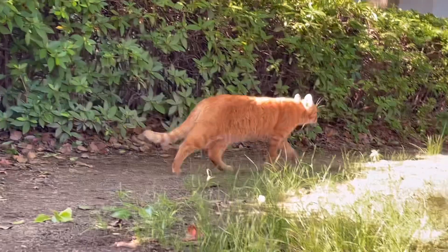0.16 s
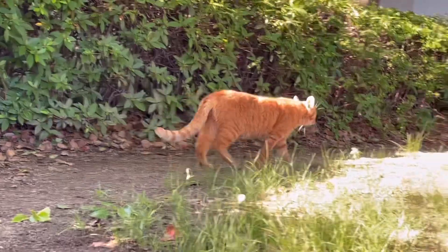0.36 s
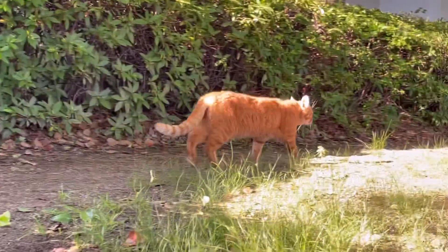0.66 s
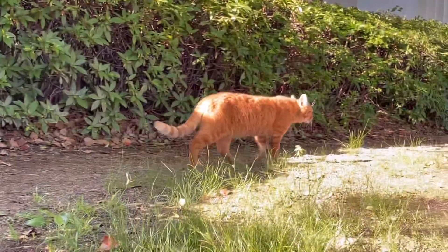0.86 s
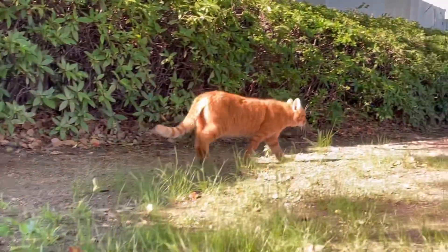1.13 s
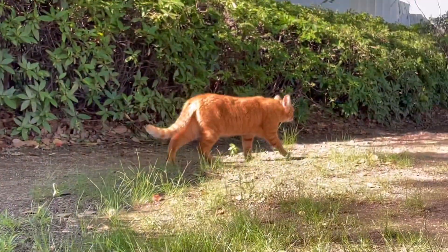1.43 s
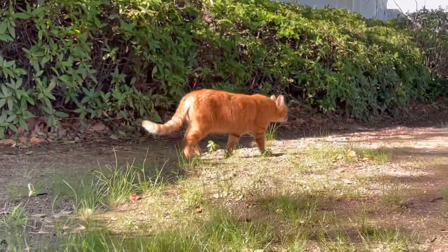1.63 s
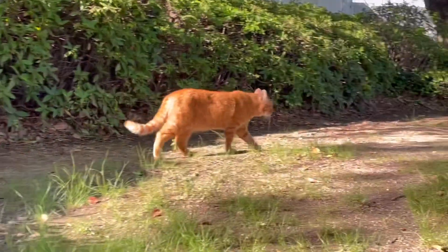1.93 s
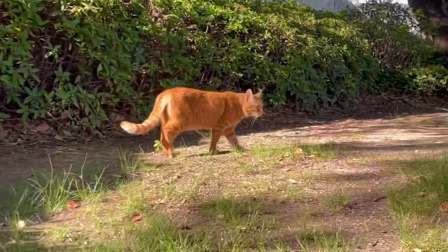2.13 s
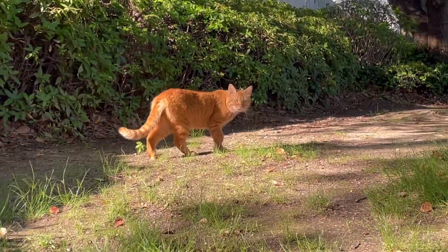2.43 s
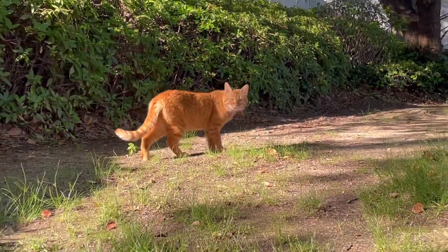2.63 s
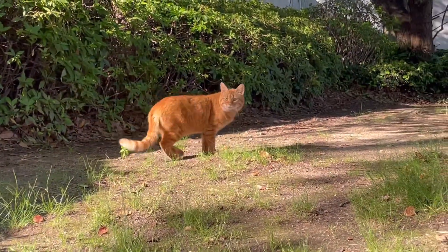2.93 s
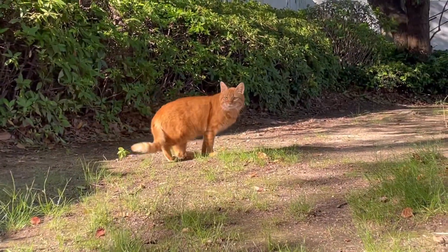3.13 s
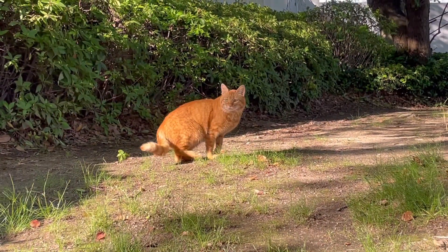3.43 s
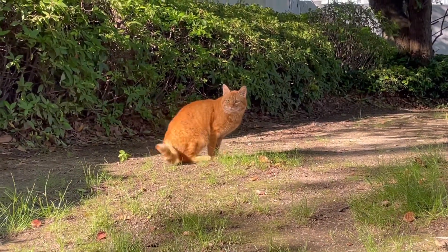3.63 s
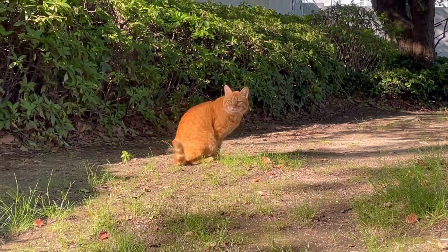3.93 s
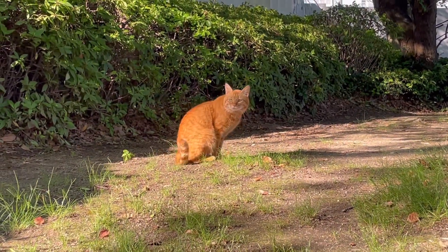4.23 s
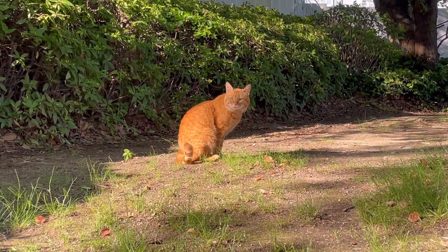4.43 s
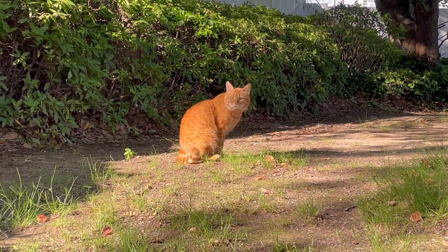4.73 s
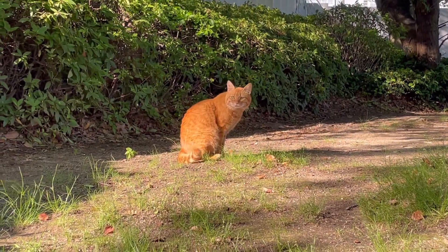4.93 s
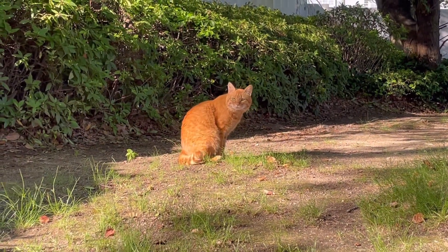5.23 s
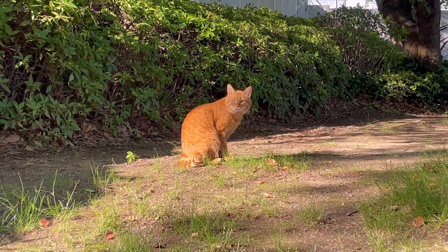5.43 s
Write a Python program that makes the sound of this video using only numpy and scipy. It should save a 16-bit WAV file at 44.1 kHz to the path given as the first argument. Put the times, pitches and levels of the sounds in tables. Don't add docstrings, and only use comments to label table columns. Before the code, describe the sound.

The sound starts in the middle of a crow's caw, close and much louder than everything else: harsh, buzzy and nasal, steady at first, then sagging in pitch and turning breathy before stopping at about 0.4 s. Trees smear it, and building echoes return around 0.6 to 1.2 s, leaning right. From 0.4 to 1.5 s dull scrapes, a short fine crackle and small ticks come from cloth or leaves near the phone; another rub begins just before the end. Faint, broken sparrow chatter is scattered from 0.8 s on, with clearer cheeps near 1.9, 3.0 and 3.95 s and a few quick notes after 5.1 s. Beneath lie deep town rumble, soft airy hiss and a wavering low hum. A heavy engine rises after 1 s, is strongest near 2.9 s, revs slightly higher, then recedes. The cat is not heard.

```python
import sys
import numpy as np
from scipy import signal
from scipy.fft import rfft, irfft
from scipy.io import wavfile
from scipy.ndimage import uniform_filter1d

SR = 44100
rng = np.random.default_rng(int(sys.argv[2]) if len(sys.argv) > 2 else 0)


def amplitude_ratio(level_db):
    exponent = np.asarray(level_db, float) / 20
    return 10 ** exponent


def unload_wav(signal):
    wavfile.write(
        sys.argv[1],
        SR,
        np.round(np.clip(np.atleast_2d(signal).T, -1, 1) * 32767).astype(np.int16),
    )


N = 245195
T = np.arange(N) / SR
LEAD = 2 * SR // 5

# (frequency [Hz], level [dB per Hz])
RUMBLE_MID = [(20, -22), (33, -7.5), (55, 8), (90, 4), (130, -1.5), (200, -11), (280, -16), (400, -25),
              (520, -49.5)]
RUMBLE_SIDE = [(20, -18), (55, -32.5), (90, -20), (200, -9), (300, -25), (400, -16), (520, -50.5)]
# (frequency [Hz], level [dB per Hz])
AIR_MID = [(250, 5), (450, 4), (1300, 1), (2000, -6), (3000, -8), (6500, -12.5), (8000, -16.5),
           (10500, -13), (12000, -13.5), (14000, -36)]
AIR_SIDE = [(250, -28), (450, 4), (1200, 2), (1700, -24), (3000, -28), (5500, -15.5), (7500, -10),
            (9000, -7), (11000, -11), (13000, -35)]
# (frequency [Hz], left minus right [dB])
TOWN_LEAN = [(60, -0.5), (170, 1.5), (320, 4), (900, 2), (1700, 3), (2600, 0)]
# (time [s], level [dB])
HUM = [
    (0, -46),
    (1.1, -50.5),
    (1.6, -44),
    (3.3, -41),
    (5.56, -50.5),
]
# (time [s], firing rate [Hz], level [dB])
ENGINE = [
    (0, 41.25, -70),
    (.95, 42.74, -53.5),
    (1.3, 44.14, -43),
    (2.4, 42.87, -46),
    (2.9, 42.97, -41.5),
    (3.3, 45.85, -46.5),
    (3.7, 45.93, -48),
    (4.1, 47.1, -53),
    (4.7, 47.36, -50.5),
    (5.56, 47.35, -54),
]
# (multiple of firing rate [1], level [dB])
ENGINE_ORDERS = [(1, -1.5), (2, -9.5), (3, -13.5), (4, -12), (5, -15), (7, -46.5), (8, -30.5), (9, -30)]
# (time [s], left minus right [dB])
MACHINE_PAN = [(0.0, 7.5), (0.73, -12), (1.16, -7), (1.79, -3.5), (3.24, -1.5), (3.95, -10.5), (4.21, -11),
               (5.11, 6.5), (5.56, -3)]
# (start [s], length [s], level [dB])
SCRAPES = [
    (.4, .24, -61),
    (.72, 0.68, -58.5),
    (1.36, 0.214, -59),
    (5.51, .2, -59),
]
# (start [s], length [s], level [dB])
CRACKLES = [
    (.59, 0.062, -62),
    (.68, 0.23, -57.5),
]
# (time [s], dull level [dB], bright level [dB])
TICKS = [
    (.645, -62, -64),
    (.674, -53, -80),
    (.686, -77, -54),
    (.708, -68, -55),
    (.733, -79, -70),
    (.766, -58, -64),
    (.805, -61, -62),
    (.865, -65, -80),
    (1.375, -55.5, -90),
]
# (time [s], level [dB], pitch [Hz], length [s])
CHATTER_NOTES = [(0.787, -61, 848, 0.014), (0.846, -62, 817, 0.033), (0.93, -61, 741, 0.044),
                 (1.018, -59, 752, 0.03), (1.082, -57.5, 793, 0.033), (1.318, -61, 742, 0.037),
                 (1.423, -68, 803, 0.026), (1.478, -57, 770, 0.026), (1.623, -63.5, 772.3, 0.042),
                 (1.789, -62, 760, .032), (2.037, -61, 870, 0.038), (2.196, -63, 900, .039),
                 (2.309, -62, 800, 0.042), (2.448, -66.5, 778, 0.049), (2.552, -62, 912, 0.045),
                 (3.39, -67, 865, .035), (4.092, -62.5, 938, 0.064), (4.177, -68, 875, 0.0295),
                 (4.641, -61.5, 798, 0.06), (4.69, -58, 787, 0.053), (5.157, -60.5, 737, .022),
                 (5.237, -60, 828, 0.016), (5.306, -56.5, 870, .026), (5.381, -56, 893, 0.037)]
# (time [s], level [dB])
CHEEPS = [
    (1.893, -50),
    (3.01, -51),
    (3.95, -50),
]
# (start [s], length [s], from [Hz], to [Hz], level [dB])
CHEEP_PARTS = [
    (-.01, 0.022, 4880, 5600, -14),
    (0, .014, 2885, 4520, -10),
    (.013, 0.019, 4460, 3980, -4),
    (0.025, .011, 3900, 3000, -7),
    (.035, 0.017, 3010, 2630, -3.5),
]
# (time [s], pitch [Hz])
CAW_PITCH = [
    (0, 387),
    (.056, 387),
    (.12, 375.9),
    (.174, 367),
    (.24, 349.6),
    (.29, 326.3),
    (.342, 304.2),
    (.36, 272),
    (.385, 224.1),
]
# (frequency [Hz], level [dB])
THROAT = [(300, -50), (420, -65), (600, -45.5), (780, -45), (930, -31), (1160, -27.5), (1450, -34.5),
          (1750, -27.5), (1950, -41.5), (2200, -37), (2680, -34), (3050, -50.5), (3300, -68.5),
          (4600, -54.5)]
THROAT_TOP = [(4600, -1.5), (5500, 4), (6500, -8), (7500, -30.5), (12000, -24)]
# (centre [Hz], width [Hz], gain [dB])
NOTCHES = [(1238, 25, 5), (1080, 4.6, -5), (1299, 4.7, -9), (1366, 12, -12.5), (1477, 4.9, -26),
           (1471, 12, -24), (2368, 150, -17), (2770, 12, -22.5), (4190, 100, -9), (5155, 160, -17),
           (5820, 290, -14.5)]
# (frequency [Hz], level [dB per Hz])
RASP = [(1500, -58), (3300, -6), (4800, -6.5), (6300, -12), (7500, -5.5), (10000, -15.5), (14000, -19.5)]
# (frequency [Hz], level [dB])
CAW_SIDE = [(300, -28), (1000, -5.5), (1500, -12), (2700, -7), (5000, -3.5), (7500, 7.5), (9000, 11.5),
            (11000, -2)]
# (delay [s], level [dB])
FACADES = [
    (.58, -46),
    (.8, -35),
]
# (frequency [Hz], gain [dB])
PORTS = [(7800, -1), (8300, -12.5), (9500, -13), (10000, -5), (12500, -3.5), (14500, -15), (15500, -25)]


def curve(table, t=T):
    s, *columns = np.transpose(table)
    return [np.interp(t, s, c) for c in columns]


def shape(table, hz):
    f, db = np.transpose(table)
    return np.interp(np.log(np.maximum(hz, 1)), np.log(f), db)


def colour(x, table):
    hz = np.fft.rfftfreq(x.shape[-1], 1 / SR)
    return irfft(rfft(x) * amplitude_ratio(shape(table, hz)), x.shape[-1])


def unit(x):
    return x / np.sqrt(np.mean(x ** 2))


def stereo(mid, side):
    return np.array([mid + side, mid - side])


def walk(rate, size=N):
    k = int(SR / rate)
    steps = np.repeat(rng.standard_normal(size // k + 1), k)
    return 1.458 * uniform_filter1d(uniform_filter1d(steps, k), k)[:size]


def add(out, x, s):
    i = int(s * SR)
    x = x[..., :N - i]
    out[..., i:i + x.shape[-1]] += x


def town():
    hum_db = curve(HUM)[0]
    rumble_db = -50 + 0.41 * (hum_db - hum_db.max())
    air_db = -77.5 + 5.5 * np.exp(-T ** 2)
    breeze_db = -5.5 + 2.5 * T
    noise = rng.standard_normal((4, N))
    rumble = stereo(colour(noise[0], RUMBLE_MID), colour(noise[1], RUMBLE_SIDE))
    rumble = rumble * amplitude_ratio(rumble_db + 25.5 + 1.18 * walk(3.01))
    air = stereo(colour(noise[2], AIR_MID), colour(noise[3], AIR_SIDE))
    top = colour(air, [(3000, -29), (6000, -4), (8000, -4.5)])
    air = (air + top * (amplitude_ratio(breeze_db) - 1)) * amplitude_ratio(air_db + 20.5)
    both = rumble + air * amplitude_ratio(0.6 * walk(4))
    left = colour(both[0], [(f, d / 2) for f, d in TOWN_LEAN])
    right = colour(both[1], [(f, -d / 2) for f, d in TOWN_LEAN])
    return np.array([left, right])


def hum():
    hz = 68.2 * (1 + 0.0078 * walk(12))
    level_db = curve(HUM)[0] + 3.5 * walk(9)
    tone = np.sqrt(2) * np.sin(2 * np.pi * np.cumsum(hz) / SR) * amplitude_ratio(level_db)
    return stereo(tone, -0.02 * tone)


def engine():
    hz, db = curve(ENGINE)
    phase = 2 * np.pi * np.cumsum(hz * (1 + 0.0066 * walk(5.64))) / SR
    tone = np.zeros(N)
    for k, order_db in ENGINE_ORDERS:
        level = amplitude_ratio(order_db + 2.53 * walk(8)) * np.sqrt(2)
        tone += level * np.sin(k * phase + rng.uniform(0, 6.7))
    return stereo(tone, -colour(tone, [(40, -43), (200, -4.5)])) * amplitude_ratio(db)


def strokes(table, db_per_s):
    attack_s, release_s = 0.041, 0.023
    gain = np.zeros(N)
    for s, length, db in table:
        attack = np.clip((T - s) / attack_s, 0, 1) ** 2
        release = np.clip(1 - (T - s - length) / release_s, 0, 1) ** 2
        gain += amplitude_ratio(db + db_per_s * np.maximum(T - s, 0)) * attack * release
    return gain


def rustle():
    dull = [(150, -38), (300, -3.5), (900, -5.0), (1500, -12.5), (2500, -39.5)]
    bright = [(5000, -30), (7000, 0), (9000, -8.0), (11000, 9.5), (14000, -8.0), (16000, -10.5)]
    grains = rng.standard_normal((4, N)) * amplitude_ratio(2.5 * rng.exponential(size=(4, N)))
    scrape = stereo(unit(colour(grains[0], dull)), 1.2 * unit(colour(grains[1], dull)))
    crackle = stereo(unit(colour(grains[2], bright)), 0.91 * unit(colour(grains[3], bright)))
    out = scrape * strokes(SCRAPES, db_per_s=-7.5) + crackle * strokes(CRACKLES, db_per_s=-101)
    lag = np.arange(1024) / SR
    for s, low_db, high_db in TICKS:
        burst = rng.standard_normal(len(lag))
        thud = unit(colour(burst * np.exp(-((lag - 0.003) / 0.0016) ** 2), dull))
        click = unit(colour(burst, bright)) * np.exp(-lag / 0.0022)
        tick = amplitude_ratio(low_db - 6.0) * thud + amplitude_ratio(high_db) * click
        add(out, stereo(tick, 0.23 * tick), s)
    return out


def chatter(length, hz, bright_hz, rough):
    u = np.linspace(0, 1, int(length * SR))
    glide = 0.8 + 0.22 * np.sin(np.pi * (0.25 + 0.7 * u))
    phase = 2 * np.pi * np.cumsum(hz * glide) / SR
    weight = amplitude_ratio(2.5 * rng.standard_normal(8))
    stack = np.zeros(len(u))
    for k in range(2, 8):
        stack += weight[k] * np.exp(-((k * hz - bright_hz) / 1700) ** 2) * np.sin(k * phase)
    flutter = unit(uniform_filter1d(rng.standard_normal(len(u)), size=40))
    return np.sin(np.pi * u) * unit(stack * (1 - rough + rough * flutter))


def whistle(length, from_hz, to_hz, rough):
    u = np.linspace(0, 1, int(length * SR))
    hz = (from_hz + (to_hz - from_hz) * u) * (1 + rough * walk(450, size=len(u)))
    level = np.sin(np.pi * u) * amplitude_ratio(3.2 * walk(910, size=len(u)))
    return level * np.sin(2 * np.pi * np.cumsum(hz) / SR)


def sparrows():
    hedge_s = 0.012
    dry = np.zeros(N)
    for s, db, hz, length in CHATTER_NOTES:
        note = chatter(length, hz, bright_hz=3400, rough=0.55)
        add(dry, amplitude_ratio(db - 2.5) * note, s - hedge_s / 3)
    for s, db in CHEEPS:
        for start, length, from_hz, to_hz, part_db in CHEEP_PARTS:
            part = whistle(length, from_hz, to_hz, rough=0.0545)
            add(dry, amplitude_ratio(db + part_db - 3.0) * part, s + start)
    lag = np.arange(int(0.25 * SR)) / SR
    hedge = np.exp(-lag / hedge_s) * amplitude_ratio(-30)
    trees = np.exp(-lag / 0.06) * amplitude_ratio(-39)
    tail = rng.standard_normal((2, len(lag))) * (hedge + trees)
    wet = signal.fftconvolve(dry[None], tail, axes=1)[:, :N]
    return stereo(amplitude_ratio(-3) * dry + wet[0], 0.5 * wet[1])


def effort(t):
    start_s, attack_s, end_s, release_s = -0.084, 0.065, 0.3533, 0.043
    hz = uniform_filter1d(curve(CAW_PITCH, t)[0], size=SR // 50)
    sag = np.maximum(1 - hz / CAW_PITCH[0][1], 0)
    shut = np.clip(1 - (t - start_s) / attack_s, 0, 1) + np.clip((t - end_s) / release_s, 0, 3) ** 2
    level_db = 4.5 - 29 * sag - 40 * shut
    weak = 0.065 + 3.5 * sag ** 2
    breath_db = -29 + 55 * sag
    return hz, level_db, weak, breath_db


def crow():
    size = LEAD + SR // 2
    hz, db, weak, breath_db = effort((np.arange(size) - LEAD) / SR)
    hz = hz * (1 + 0.04 * amplitude_ratio(breath_db) * walk(200, size=size))
    phase = np.cumsum(hz) * np.pi / SR
    fading_db = 75 * np.clip(1 - hz / 360, 0, 0.25)
    voice = np.zeros(size)
    for k in range(2, 64):
        f = k * hz / 2
        gain_db = shape(THROAT, f) + shape(THROAT_TOP, f)
        gain_db += sum(d * np.exp(-((f - c) / w) ** 2) for c, w, d in NOTCHES)
        gain_db += (f / 2500 + 0.18 * fading_db) * walk(30, size=size)
        gain_db -= fading_db * np.clip(f / 3000 - 0.55, 0, 1)
        half = np.minimum(weak * amplitude_ratio(6 * np.maximum(f - 2900, 0) / 1000), 0.7)
        share = half if k % 2 else 1
        offset = rng.uniform(0, 2.42) * (1 + 0.17 * fading_db)
        voice += share * amplitude_ratio(gain_db) * np.sqrt(2) * np.sin(k * phase + offset)
    noise = rng.standard_normal((2, size)) * (1 + 0.097 * np.cos(2 * phase))
    breath = unit(colour(noise[0], THROAT + [(6000, -63)])) * amplitude_ratio(-27 + breath_db)
    rasp = unit(colour(noise[1], RASP)) * amplitude_ratio(-46 + 0.45 * breath_db - 0.5 * fading_db)
    return (voice + breath + rasp) * amplitude_ratio(db)


def park(voice):
    quarter_turn = np.imag(signal.hilbert(voice))
    near = stereo(voice, colour(0.12 * voice + 0.71 * quarter_turn, CAW_SIDE))
    lag = np.arange(int(1.5 * SR)) / SR
    trees_db = -37 - 160 * lag
    block_db = -66 + np.minimum(31 * (lag - 0.72), -52 * (lag - 0.72))
    scatter = rng.standard_normal((2, len(lag))) * (amplitude_ratio(trees_db) + amplitude_ratio(block_db))
    scatter = scatter * (lag > 0.015) * amplitude_ratio([[-1.5], [1.5]])
    for s, db in FACADES:
        scatter[:, int(s * SR)] += amplitude_ratio(db) * amplitude_ratio(np.array([-4.0, 3.0]))
    far_colour = [(500, 0.5), (1050, -8.5), (1240, 3), (1450, 2.5), (1800, -9.5), (2700, -6.5), (6000, -37)]
    far = colour(signal.fftconvolve(voice[None], scatter, axes=1), far_colour)
    out = np.zeros((2, N))
    add(out, near[:, LEAD:], 0)
    add(out, far[:, LEAD:], 0)
    return out


def scene():
    pan_db = curve(MACHINE_PAN)[0]
    machines = (hum() + engine()) * amplitude_ratio(np.array([pan_db, -pan_db]) / 2)
    return town() + machines + rustle() + sparrows() + park(crow())


def low_pass(x):
    return signal.sosfilt(signal.butter(12, 15100, fs=SR, output="sos"), x)


def record(dry):
    side = colour((dry[0] - dry[1]) / 2, [(11000, -4.0), (12500, -3.5), (14000, -36.0)])
    heard = stereo(colour(dry.mean(0), PORTS), side)
    return low_pass(heard)


dry = scene()
out = record(dry)
unload_wav(out)
```